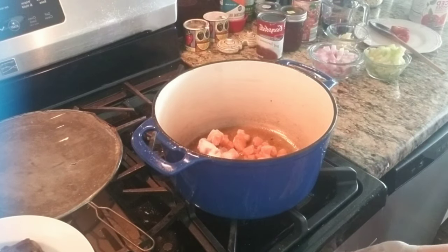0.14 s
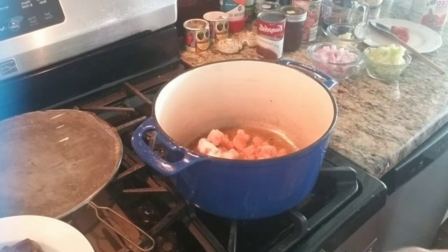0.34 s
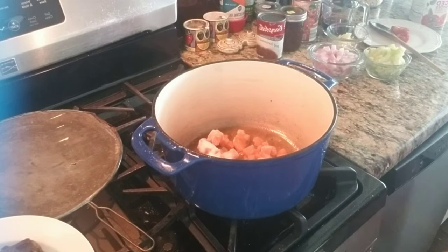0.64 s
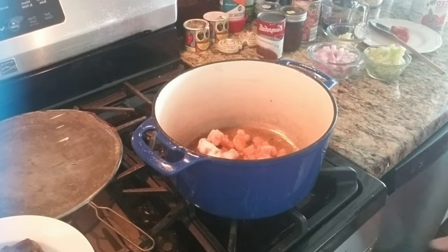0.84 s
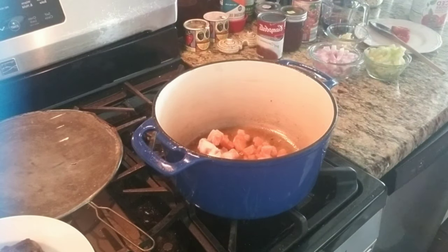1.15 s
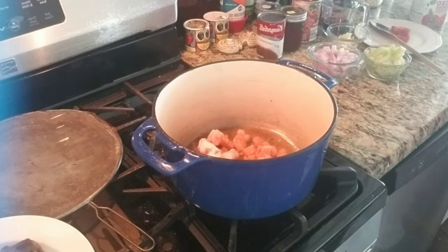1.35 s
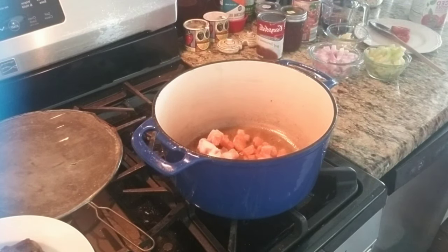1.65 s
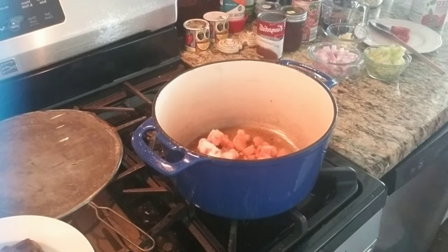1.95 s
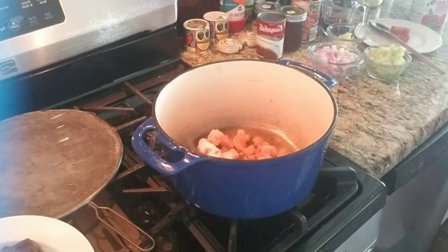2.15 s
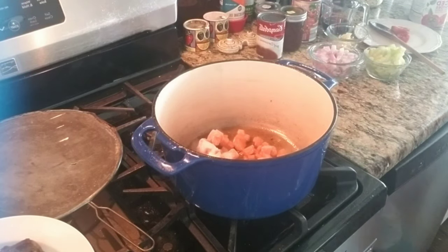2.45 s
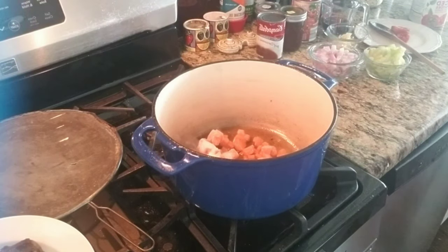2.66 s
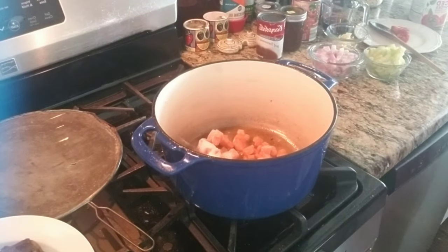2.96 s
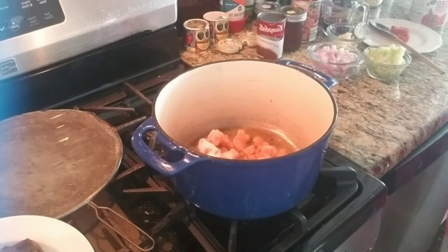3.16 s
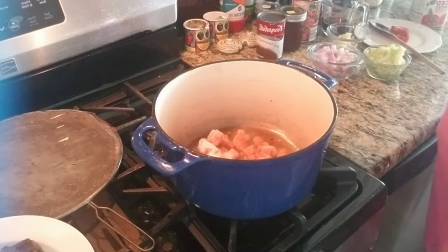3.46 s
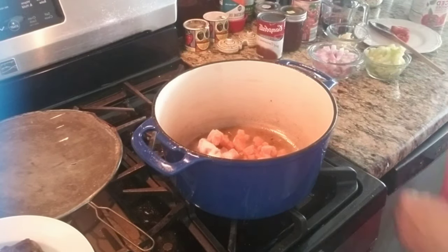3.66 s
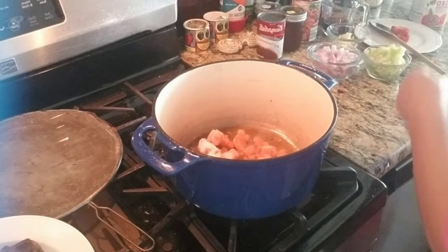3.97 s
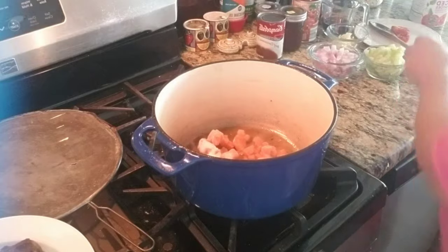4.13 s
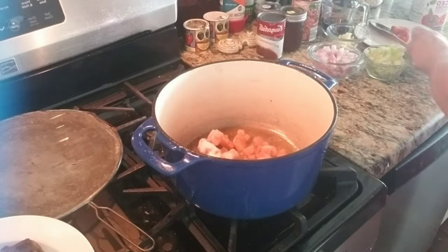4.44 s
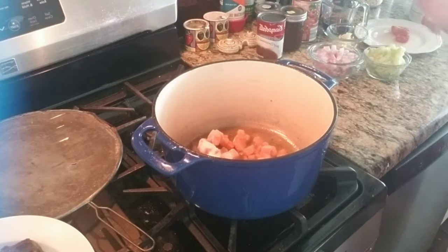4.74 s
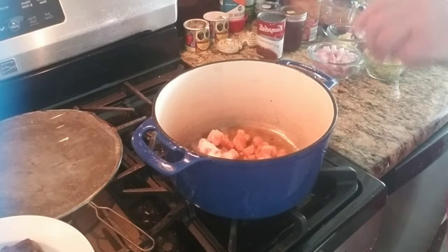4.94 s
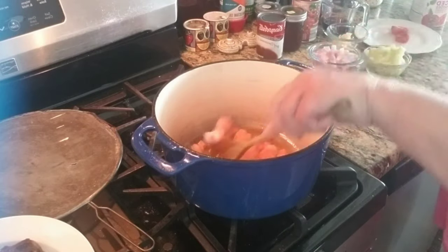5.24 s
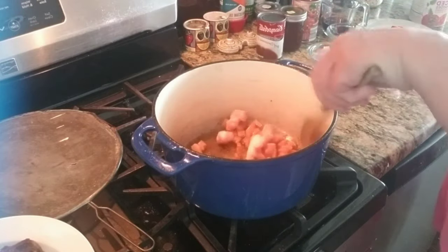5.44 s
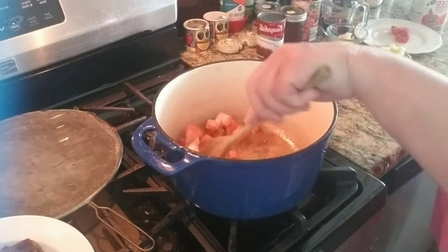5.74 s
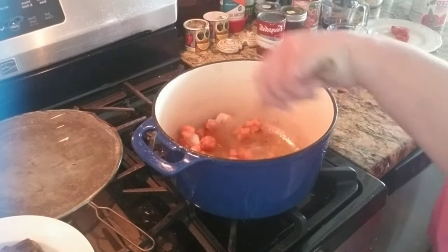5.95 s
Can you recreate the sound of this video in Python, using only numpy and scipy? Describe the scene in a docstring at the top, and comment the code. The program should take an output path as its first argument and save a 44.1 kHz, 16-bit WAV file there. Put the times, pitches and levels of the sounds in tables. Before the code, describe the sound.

A steady, dense sizzle fills the whole six seconds: thousands of tiny bright steam pops, strongest around 3 to 6 kHz, with slightly ringing bubbles and a faint hollow resonance of air in the pot. A soft burner rush and low fan hum sit underneath. Single oil spits snap at about 0.9, 1.4, 2.9, 3.1, 4.8 and 5.7 seconds. At 1.6 a drawer jolts, then bangs shut at 1.85 with a dull woody thud, cabinet ring and rattling contents that settle by about 2.5. From 5.1 a wooden spoon stirs in three short scraping strokes, with a light knock at 5.2, a loud hard knock at 5.47 and a faint one at 5.84; the coarse bubbling gradually softens. Close, small-kitchen stereo leans left and bassier until about 2.2, centres by 2.7, then leans left again briefly around 5.

```python
"""First you hear diced vegetables sizzling in oil in a heavy pot: thousands of tiny scattered steam pops.
Larger bubbles ring, oil spits and the air in the pot rings; a burner rushes and a fan hums behind.
A drawer, made of filtered noise and ringing modes, jolts and bangs shut with a rattle.
Near the end a wooden spoon knocks on the pot as ringing modes and stirs as scraping clicks.
The sound leans left with more bass at the start, and again for a moment near the end."""
import sys
import numpy as np
from scipy import signal
from scipy.fft import rfft, irfft, next_fast_len
from scipy.io import wavfile

SR = 44100
rng = np.random.default_rng(int(sys.argv[2]) if len(sys.argv) > 2 else 0)


def persist_wave(psi):
    """Save psi, clipped to +-1, as 16-bit WAV."""
    counts = np.round(np.clip(psi, -1, 1) * 32767).astype(np.int16)
    wavfile.write(sys.argv[1], SR, np.atleast_2d(counts).T)


N = 269010  # length in samples, about 6.1 s
EDGE_HZ = 15900  # top of the sizzle's bubble bands and of the finished sound

# Stirring lifts the food off the hot floor, so the coarse bubbles die down.
LIFT_START_S, LIFT_TAKES_S, LIFT_DB = 5.1, 1, -4.5
STROKE_EDGE_S = 0.056  # time a stroke of the spoon takes to swell, and to fade

# Colour of the steam pops: pitch_hz, level_db (per Hz)
POP_COLOUR = [(700, -33.5), (1300, -27.5), (1750, -22), (1980, -15.5), (2750, -8.5), (3200, -4.5),
              (4050, -2), (5000, -1.3), (5600, -2), (6050, -1.5), (7300, -10.5), (9800, -14.5),
              (11700, -11), (14300, -15), (15800, -20.5)]
# Parts of one pop, being its snap, the pot walls and the kitchen: energy_db, t60_s (time to fall 60 dB)
POP_PARTS = [(-11.5, 0.0022), (-8, 0.088), (-9.5, 0.23)]


def sizzle(band_count=12):
    """Steam bubbles of many sizes burst in clumps; each pop scatters round the pot, then the kitchen."""
    sizzle_db, pops_per_s = -27, 9000
    clump_db, clump_hz = 0.75, 5.8  # random wandering of each size of bubble
    fizz_from_hz, fizz_db = 7500, -0.5
    flare_db, fizz_lift_db = 1, -1  # fizz flares while the spoon pushes, sinks between strokes

    pushing = sum(stroke(start_s, length_s) for start_s, length_s, _ in STROKES)
    coarse_db = LIFT_DB * ramp(LIFT_START_S, LIFT_TAKES_S)
    fine_db = fizz_db + fizz_lift_db * ramp(LIFT_START_S, STROKE_EDGE_S) + flare_db * pushing

    # Power of one pop as it dies away
    t = np.arange(8192) / SR
    pop_power = sum(amp(energy_db - 60 * t / t60) ** 2 / t60 for energy_db, t60 in POP_PARTS)

    out = np.zeros((2, N))
    band_hz = EDGE_HZ / band_count
    for hz in (np.arange(band_count) + .5) * band_hz:
        bursts = clicks(pops_per_s / band_count, spread_db=2.0) ** 2
        power = abs(signal.oaconvolve(bursts, pop_power)[:N])
        # Each bubble sits somewhere else, so its echoes are new every time
        pops = evened(np.sqrt(power) * rng.standard_normal((2, N)))
        size_db = fine_db if hz > fizz_from_hz else coarse_db
        pops *= amp(size_db + clump_db * drift(clump_hz))
        out += signal.oaconvolve(pops, pip(hz, band_hz)[None], "same", axes=1)
    # Fixed surfaces round the stove comb the sound a little
    out += amp(-10) * signal.oaconvolve(out, scatter(t60=0.05), axes=1)[:, :N]
    return amp(sizzle_db) * shaped(out, POP_COLOUR)


def blips(pitch_count=24):
    """Larger bubbles each ring for a moment as they burst; they grow quieter during the stirring."""
    blips_per_s, blip_db = 110, -38.5
    low_hz, high_hz, t60_s = 2985, 6227, 0.067
    t = np.arange(2048) / SR
    out = np.zeros((2, N))
    for hz in np.geomspace(low_hz, high_hz, pitch_count):
        phase, gain = rng.random((2, 2, 1))
        ring = (.5 + gain) * np.sin(2 * np.pi * (hz * t + phase)) * amp(-60 * t / t60_s)
        ring *= 1 - np.exp(-t / 0.0013)  # soft start
        bursts = clicks(blips_per_s / pitch_count, spread_db=1.5)
        out += signal.oaconvolve(bursts[None], ring, axes=1)[:, :N]
    return amp(blip_db + LIFT_DB * ramp(LIFT_START_S, LIFT_TAKES_S)) * evened(out)


# Single loud spits of oil: start_s, peak_db, pitch_hz
SPITS = [(0.933, -19, 4220), (1.4473, -13, 5270), (2.913, -20, 5800), (3.067, -18, 4400),
         (4.799, -20, 5200), (5.683, -14, 4800)]


def spits():
    """Larger drops of water flash to steam: each is a short snap with a quick scatter of echoes."""
    out = np.zeros((2, N))
    for start_s, peak_db, hz in SPITS:
        path = amp(8) * scatter(t60=0.028)
        path[:, 0] += 1  # the direct sound
        snap = signal.fftconvolve(path, pip(hz, width_hz=2400)[None], axes=1)
        add(out, start_s - .001, amp(peak_db) * snap / abs(snap).max())
    return out


# Air resonances of the pot: pitch_hz, width_hz, level_db (against each other)
POT_AIR = [(512.3, 38, -0.5), (750, 60, -6), (1012, 82, -0.5), (1091, 47, 1.5), (1563, 43, -3),
           (1950, 117, -2)]


def pot():
    """The bubbling sets the air in the pot ringing at its own pitches."""
    def air_gain(hz):
        return sum(amp(db) / (1 + (2 * (hz - centre) / width) ** 2) for centre, width, db in POT_AIR)

    bubbles = paired(np.array([clicks(700, spread_db=3.5), clicks(700, spread_db=4)]))
    return amp(-48.0) * evened(coloured(bubbles, air_gain))


# Knocks of the drawer: start_s, peak_db (before a small left-right tilt), hardness_db
KNOCKS = [(1.594, -15, 2.5), (1.603, -20.5, -1), (1.641, -19, -2), (1.849, -10.5, -2), (1.903, -21, 2),
          (1.94, -17.5, 4), (2.008, -27, 0.5)]
# Colour of the drawer's dull thud: pitch_hz, level_db (per Hz)
THUD = [(25, -56), (70, -26), (135, -28), (190, -7.5), (290, -7.5), (350, -9.5), (480, -6), (570, -12),
        (700, -10.5), (950, -18.5), (1500, -18.5), (2500, -28), (6000, -28), (14000, -32.5)]
# Ringing modes of the cabinet: pitch_hz, level_db, t60_s
CABINET = [(72, -22, 0.87), (117.6, -15.5, 0.89), (186.2, 3, 0.17), (208, 4.5, 0.18), (248, -3.5, 1),
           (292.5, -0.5, 0.83), (392, -8, 0.69), (440, 1, 0.62), (466.5, 6, 0.27), (653, -5, 0.52),
           (785, -14, 0.22), (877, -12, 0.79), (1094, -13, 0.95), (1170, -21, 0.33)]


def drawer():
    """A drawer jolts, then bangs shut; the cabinet rings and the contents rattle and settle."""
    rattle_db, rattles_per_s = -14.5, 330  # level is against the knock
    ring_db = -8.5  # how strongly the clatter rings the cabinet

    rattle = np.sqrt(sum((amp(peak_db + rattle_db) * shaken(start_s)) ** 2 for start_s, peak_db, _ in KNOCKS))
    clatter = np.array([clicks(rattles_per_s, spread_db=1.4) for _ in range(2)])
    rung = signal.oaconvolve(clatter[:1], ringing(CABINET, side_db=-22), axes=1)[:, :N]
    out = rattle * (shaped(clatter, THUD) + amp(ring_db) * evened(rung))

    for start_s, peak_db, hard_db in KNOCKS:
        short_and_long = scatter(t60=0.083, size=32768) + amp(-3.5) * scatter(t60=0.67, size=32768)
        thud = shaped(short_and_long, THUD)
        blow = thud / np.linalg.norm(thud[0]) + ringing(CABINET, side_db=-16.5)
        contact_s = 0.0035 / amp(hard_db)  # a harder blow is shorter
        add(out, start_s, struck(blow, peak_db, hard_db, pivot_hz=390, contact_s=contact_s))
    return out * amp([[.5], [-.5]])  # a touch louder on the left


def shaken(start_s):
    """Loudness of the shaken contents after one knock: it builds up, then dies away."""
    rise_s, t60_s = 0.057, 0.73
    age = np.maximum(np.arange(N) / SR - start_s, 0)
    return ramp(start_s, rise_s) * amp(-60 * age / t60_s)


# Strokes of the spoon through the vegetables: start_s, length_s, scrape_db
STROKES = [(5.123, 0.29, -34.5), (5.502, 0.33, -35.5), (5.8, 0.41, -32.5)]
# Colour of the scrape: pitch_hz, level_db (per Hz)
SCRAPE = [(100, -30), (650, -11), (810, -4.5), (900, -6), (1350, -9.5), (1580, -3), (1750, -9.5),
          (2450, -2), (5000, -27), (6400, 9), (7500, -11), (15000, -8)]
# Wooden spoon against the pot: start_s, peak_db, pitch_factor (a plain number), hardness_db
SPOON = [(5.178, -22, 0.51, 11), (5.4682, -5, 0.97, 8.5), (5.4725, -16, 0.97, 1), (5.4895, -18, 1, 12),
         (5.836, -27.5, 0.79, -11)]
# Ringing modes of a knock: pitch_hz (before pitch_factor), level_db, t60_s
SPOON_MODES = [(930, -8.5, 0.027), (1070, 5.5, 0.057), (1360, -3, 0.044), (2410, -18, .05),
               (3240, -7, 0.13), (3780, -5, 0.089), (4100, 5, 0.035), (4570, -7, 0.033), (6460, -10, 0.045)]


def spoon():
    """Wood knocks on the pot wall, ringing its modes, and scrapes through the vegetables."""
    push = sum(amp(scrape_db) * stroke(start_s, length_s) for start_s, length_s, scrape_db in STROKES)
    grains = np.array([clicks(550, spread_db=0), clicks(600, spread_db=1.0)])
    out = push * shaped(grains, SCRAPE)
    for start_s, peak_db, pitch, hard_db in SPOON:
        modes = [(hz * pitch, db, t60) for hz, db, t60 in SPOON_MODES]
        ring = ringing(modes, side_db=-12.0, size=8192)
        echoes = scatter(t60=0.011) + amp(3.5) * scatter(t60=0.28)
        crack = signal.fftconvolve(echoes, pip(3800, width_hz=2640)[None], "same", axes=1)
        knock = ring + amp(1) * crack / np.linalg.norm(crack[0])
        add(out, start_s, struck(knock, peak_db, hard_db, pivot_hz=1800, contact_s=0.00067))
    return out


def stroke(start_s, length_s):
    """Speed of the spoon in one stroke, 0 to 1: it sets off, pushes, stops."""
    stopping = ramp(start_s + length_s - STROKE_EDGE_S, STROKE_EDGE_S)
    return ramp(start_s, STROKE_EDGE_S) * (1 - stopping)


# Colour of the burner and fan wash: pitch_hz, level_db (per Hz)
BURNER = [(20, -29), (55, -8.5), (85, -19.5), (120, -8.5), (165, -19.5), (205, -7), (238, 3.5), (265, -4.5),
          (305, -9), (470, -7), (620, -11.5), (880, -17), (1400, -9.5), (8000, -51)]
# Fan hum: pitch_hz, level_db (average level, which wavers a little)
HUM = [(120, -70.5), (190.5, -90), (240.8, -47)]


def stove():
    """Soft rush of the burner as coloured noise, with a fan's hum as slightly wavering tones."""
    t = np.arange(N) / SR
    hum = 0
    for hz, level_db in HUM:
        level = amp(level_db + 0.73 * drift(rate_hz=9.5)) * np.sqrt(2)
        hum = hum + level * np.sin(2 * np.pi * hz * t + 0.67 * drift(rate_hz=2.1))
    return hum + amp(-49.0) * shaped(rng.standard_normal((2, N)), BURNER)


def scene():
    """Everything at the stove, added together."""
    return sizzle() + blips() + spits() + pot() + drawer() + spoon() + stove()


# How far the sound leans left: time_s, share (0 is none, 1 is full)
LEAN = [(0, 0.93), (1.5, 1.11), (2.15, 1.1), (2.7, 0.0), (4.45, 0.03), (5.0, 0.97), (5.2, 0.68), (5.45, 0),
        (6.1, 0.04)]
# Colour added at full lean: pitch_hz, left_db, right_db
LEAN_COLOUR = [(125, 12, 12), (240, 3.7, 3.2), (500, 1.3, .6), (1500, 1.8, .7), (3000, 3.6, 1.7),
               (4500, 5.4, 0), (6000, 8.1, -.7), (7200, 4.1, .4), (8400, -1, 5), (10000, 1.4, 0),
               (11500, 3.3, -1.5), (14500, 6.2, -1.9)]
# How much louder left is than right: pitch_hz, difference_db
BALANCE = [(250, 0), (700, .5), (1300, .6), (2400, 1), (4400, 2.6), (6000, 3.3), (8300, -.7), (11000, 1.2),
           (15000, 2)]


def record(dry):
    """Slides the stereo colour between centred and left-leaning with more bass, then cuts the top."""
    hz, t, spectrum = signal.stft(dry, SR, nperseg=1024, noverlap=768)
    lean = np.interp(t, *np.transpose(LEAN))
    colour_db = np.array([read(LEAN_COLOUR, hz), read(LEAN_COLOUR, hz, axis=2)])
    balance_db = np.outer([.5, -.5], read(BALANCE, hz))
    spectrum = spectrum * amp(balance_db[..., None] + colour_db[..., None] * lean)
    wet = signal.istft(spectrum, SR, nperseg=1024, noverlap=768)[1][:, :N]
    low_pass = signal.firwin(511, EDGE_HZ, window=("kaiser", 9), fs=SR)
    return signal.oaconvolve(wet, low_pass[None], "same")


def struck(sound, peak_db, hard_db, pivot_hz, contact_s):
    """A blow builds up over its contact time; a harder one tilts the spectrum up about the pivot."""
    sound = sound * (1 - np.exp(-(np.arange(sound.shape[1]) / SR / contact_s) ** 2))
    sound = coloured(sound, lambda hz: amp(hard_db * np.tanh(np.log((hz + 1) / pivot_hz))))
    return amp(peak_db) * sound / abs(sound).max()


def ringing(modes, side_db, size=32768):
    """Dying modes of a struck body; each mode radiates its own way to left and right."""
    t = np.arange(size) / SR
    mid_side = np.zeros((2, size))
    for hz, db, t60 in modes:
        phase = rng.random((2, 1))
        mid_side += amp(db - 60 * t / t60) * np.sin(2 * np.pi * (hz * t + phase))
    mid, side = mid_side
    ring = mid + amp(side_db) * np.array([side, -side])
    ring *= 1 - np.exp(-t * modes[-1][0])  # soft start
    return ring / np.linalg.norm(ring[0])  # left channel gets energy 1


def scatter(t60, size=8192):
    """A dying cloud of reflections for each channel, of energy 1."""
    cloud = rng.standard_normal((2, size)) * amp(-60 * np.arange(size) / SR / t60)
    return cloud / np.linalg.norm(cloud, axis=1, keepdims=True)


def clicks(per_s, spread_db):
    """Random clicks of either sign, most small and a few large."""
    present = rng.random(N) < per_s / SR
    sign = rng.choice([-1, 1], N)
    return present * sign * amp(spread_db * np.minimum(rng.exponential(1, N), 5))


def pip(hz, width_hz, size=128):
    """A burst of a few cycles, as a bubble snaps open."""
    t = (np.arange(size) - size // 2) / SR
    return np.exp(-(np.pi * width_hz * t) ** 2) * np.cos(2 * np.pi * hz * t)


def shaped(x, colour):
    """Stereo sound of average level (rms) 1 with its spectrum filtered by the given colour."""
    return evened(coloured(paired(x), lambda hz: amp(read(colour, hz))))


# Likeness of left and right: pitch_hz, likeness (0 is unrelated, 1 is identical)
SAME = [(250, 1), (330, .92), (500, .9), (800, .68), (1150, .85), (1600, .25), (2200, .7), (4000, .55),
        (5000, .25), (7000, 0)]


def paired(x):
    """Blends two unrelated channels: alike in the bass, apart in the treble."""
    size = next_fast_len(x.shape[1])
    a, b = rfft(x, size)
    same = np.clip(read(SAME, np.fft.rfftfreq(size, 1 / SR)), -1, 1)
    mid = a * np.sqrt((1 + same) / 2)
    side = b * np.sqrt((1 - same) / 2)
    return irfft(np.array([mid + side, mid - side]), size)[:, :x.shape[1]]


def coloured(x, gain_at, size=4096):
    """Filter whose gain depends on pitch and which never sounds before its input (minimum phase)."""
    log_gain = np.log(np.maximum(gain_at(abs(np.fft.fftfreq(size, 1 / SR))), 1e-5))
    taps = np.fft.ifft(np.exp(np.conj(signal.hilbert(log_gain)))).real
    return signal.oaconvolve(x, taps[None], axes=1)[:, :x.shape[1]]


def drift(rate_hz):
    """Slow random wandering of rms 1."""
    hz = np.fft.rfftfreq(N, 1 / SR)
    return evened(irfft(rfft(rng.standard_normal(N)) / (1 + (hz / rate_hz) ** 2), N))


def ramp(start_s, takes_s):
    """Rises from 0 to 1, then holds."""
    return np.clip((np.arange(N) / SR - start_s) / takes_s, 0, 1)


def add(mix, start_s, sound):
    """Mixes a stereo sound in at its start time."""
    part = mix[:, round(start_s * SR):][:, :sound.shape[1]]
    part += sound[:, :part.shape[1]]


def read(points, hz, axis=1):
    """Reads one column of a pitch table, sliding smoothly between pitches on a log scale."""
    table = np.transpose(points)
    return np.interp(np.log(hz + 1), np.log(table[0] + 1), table[axis])


def evened(x):
    """Scales to rms 1."""
    return x / np.sqrt(np.mean(x ** 2) + 1e-20)


def amp(db):
    """Decibels to gain."""
    return 10 ** (np.asarray(db) / 20)


dry = scene()
out = record(dry)
persist_wave(out)
```